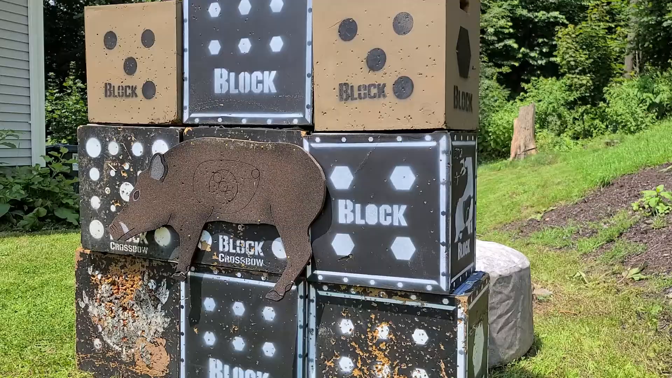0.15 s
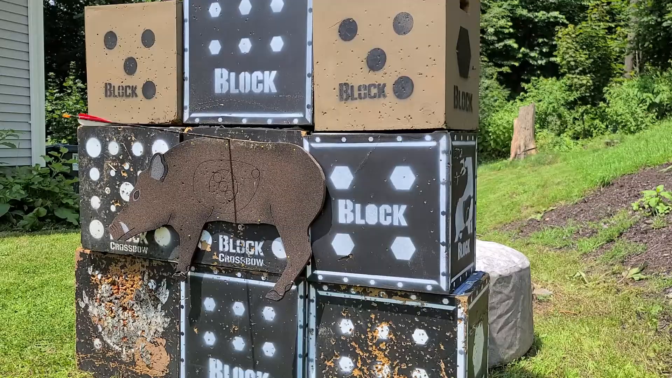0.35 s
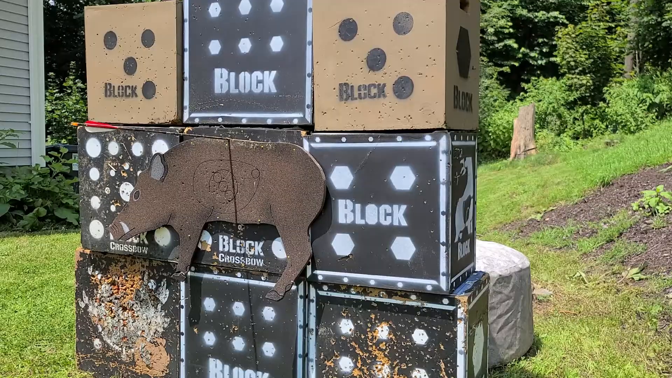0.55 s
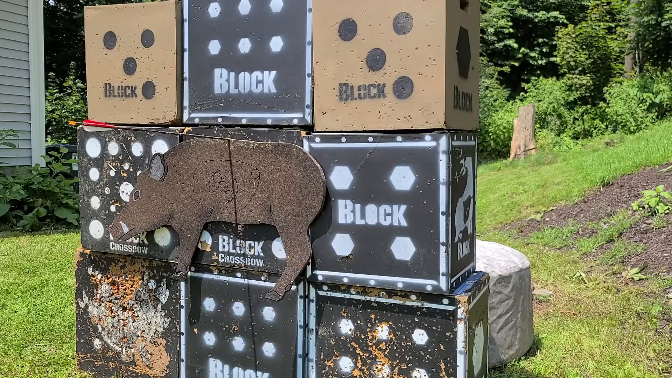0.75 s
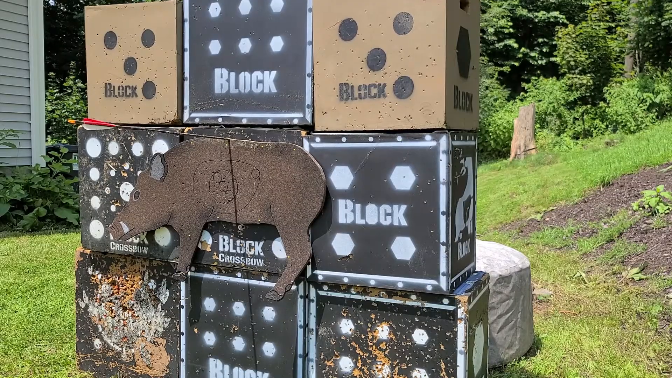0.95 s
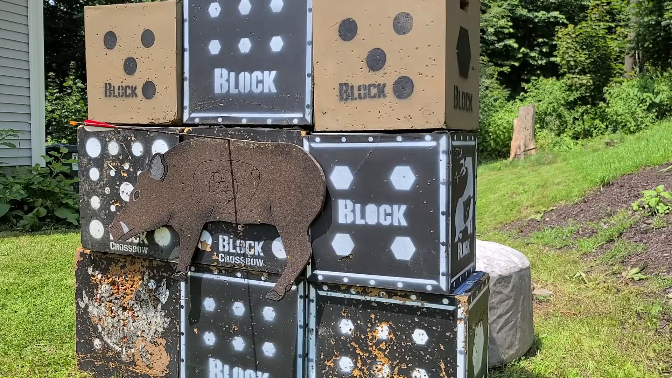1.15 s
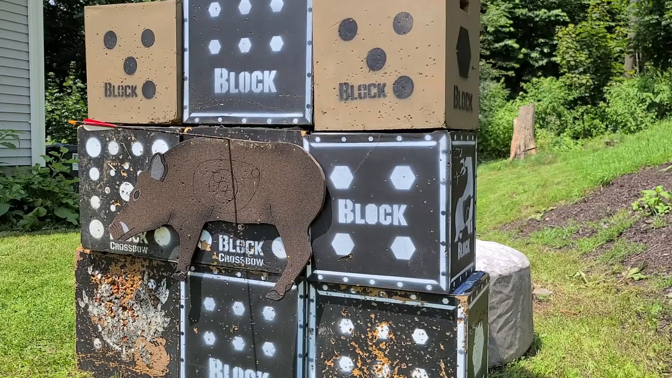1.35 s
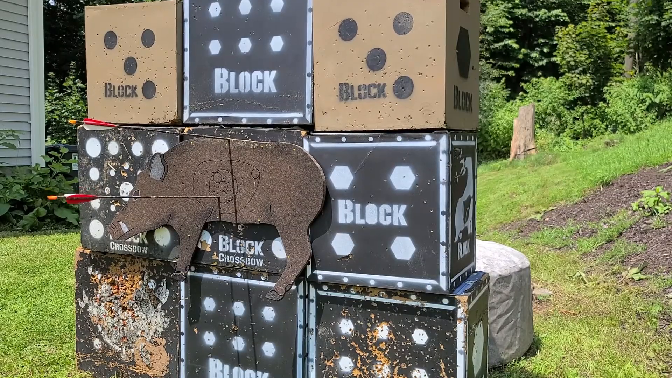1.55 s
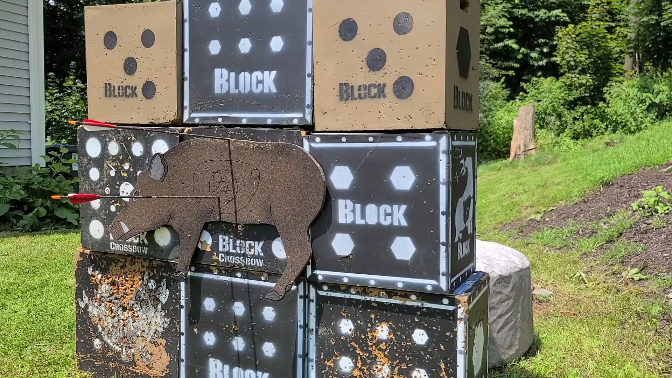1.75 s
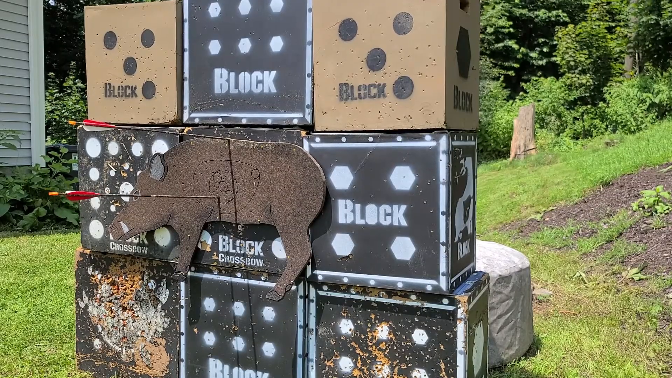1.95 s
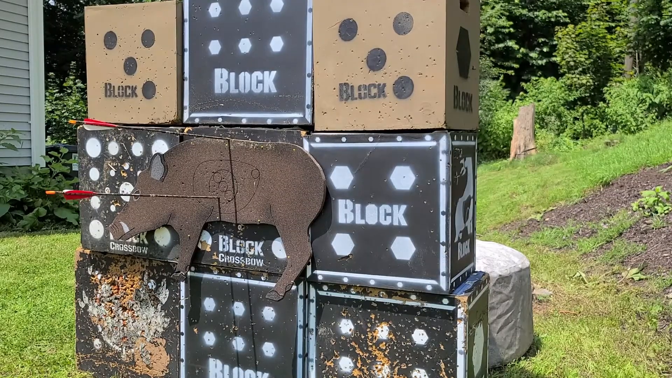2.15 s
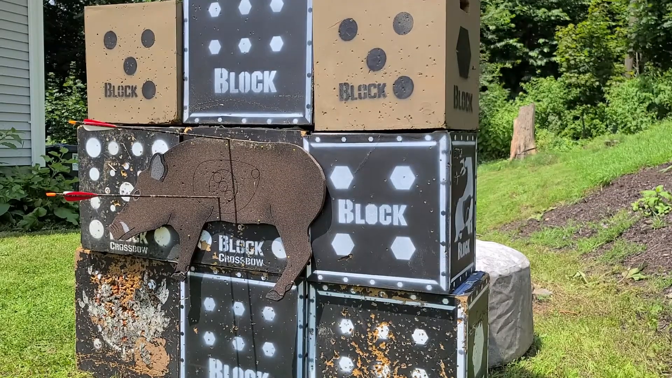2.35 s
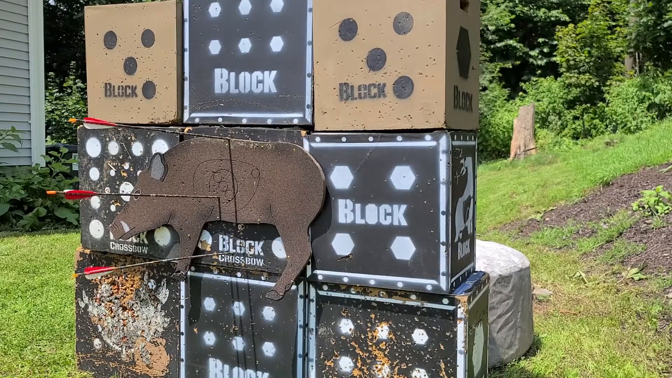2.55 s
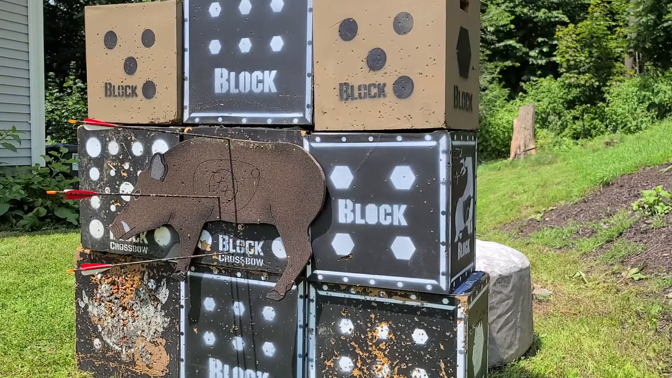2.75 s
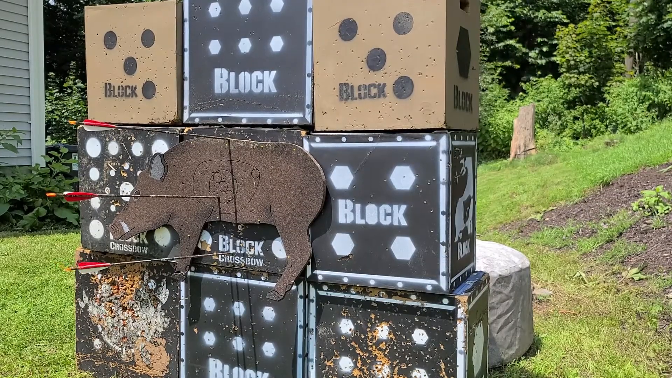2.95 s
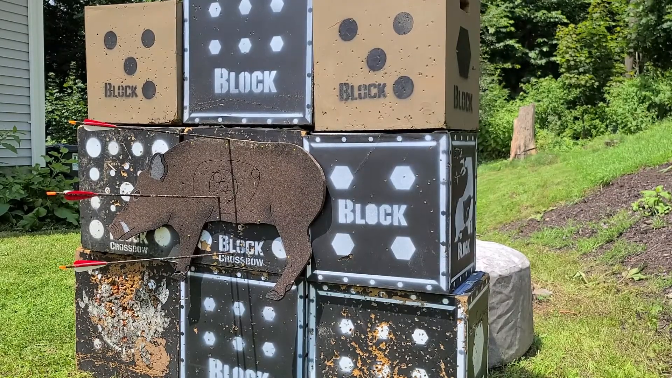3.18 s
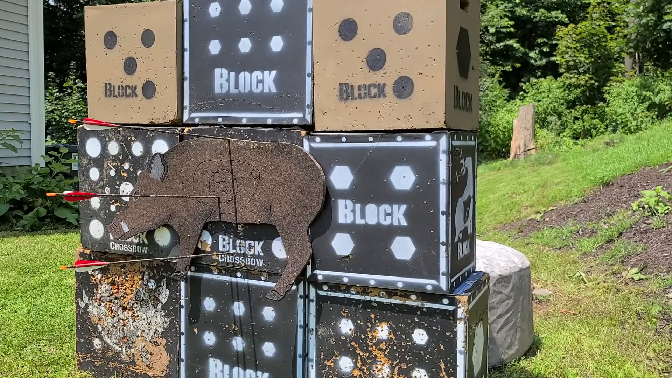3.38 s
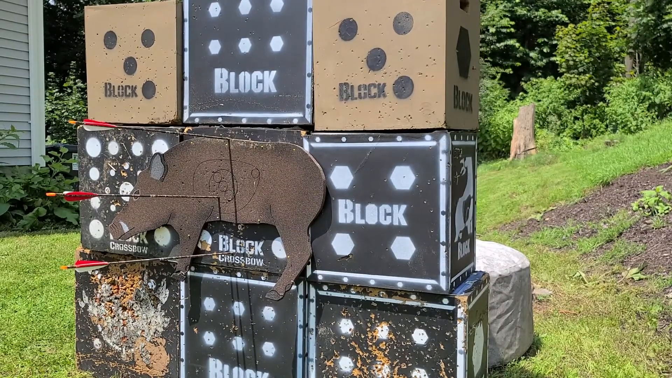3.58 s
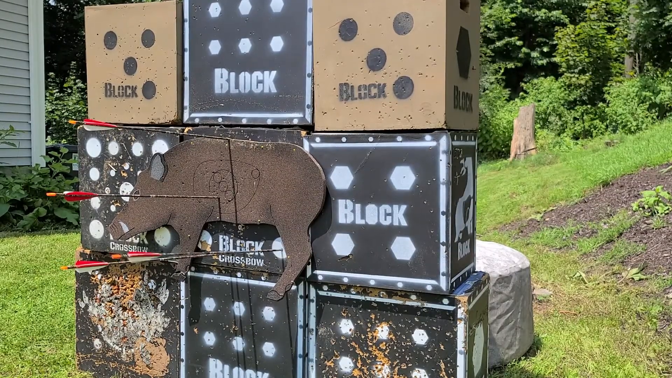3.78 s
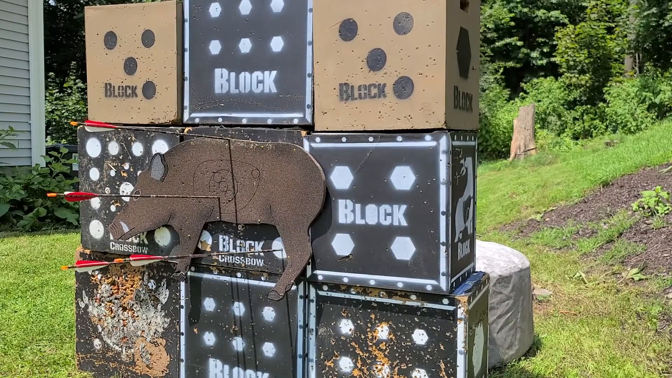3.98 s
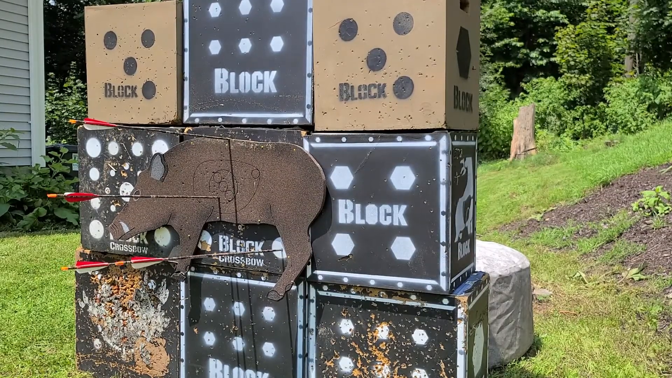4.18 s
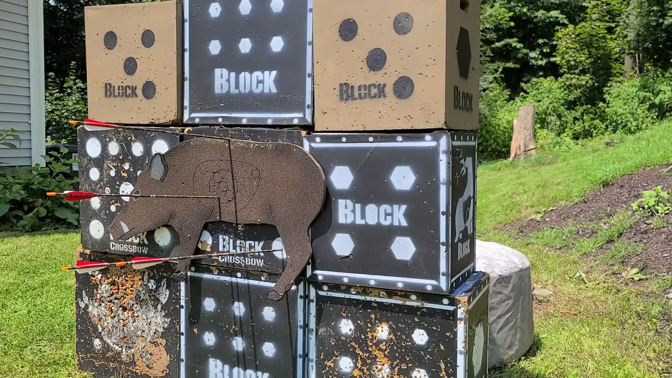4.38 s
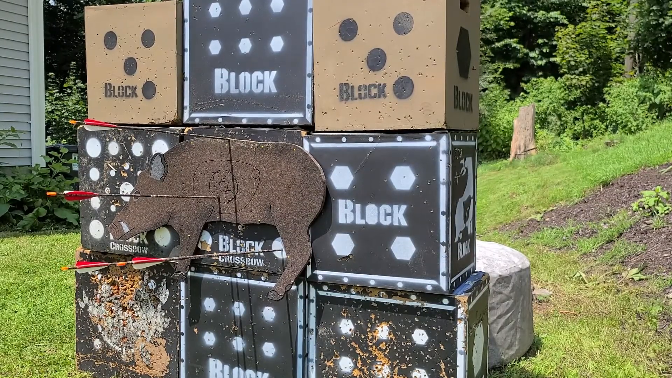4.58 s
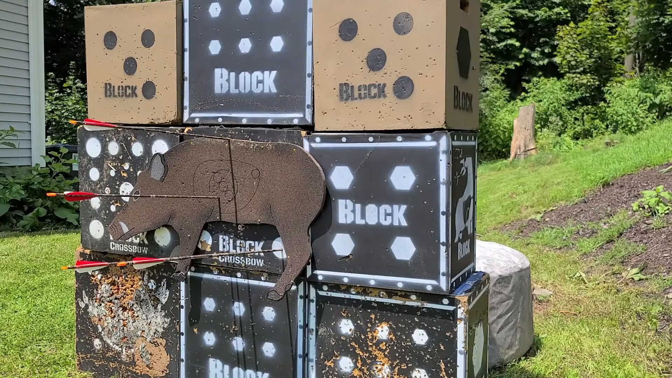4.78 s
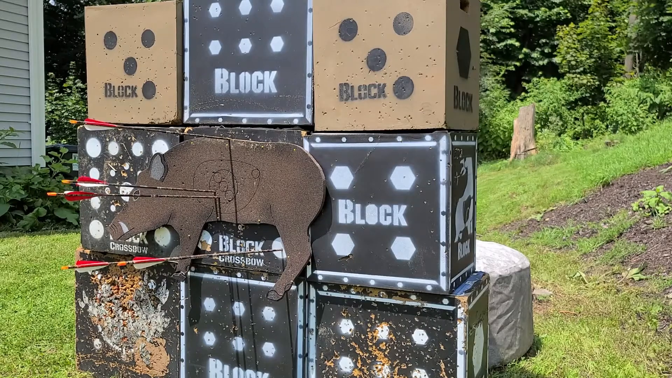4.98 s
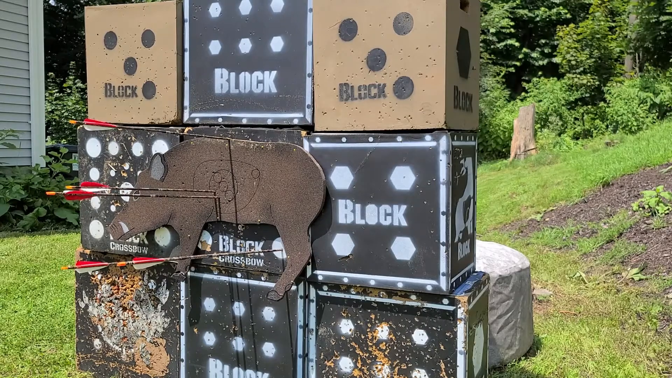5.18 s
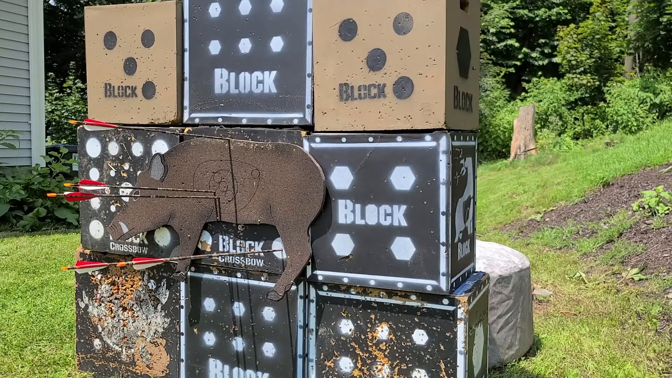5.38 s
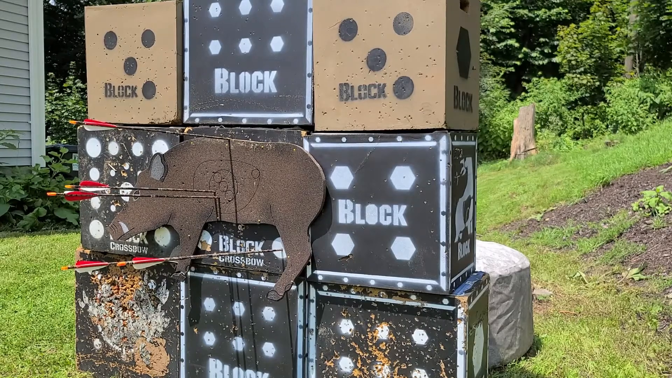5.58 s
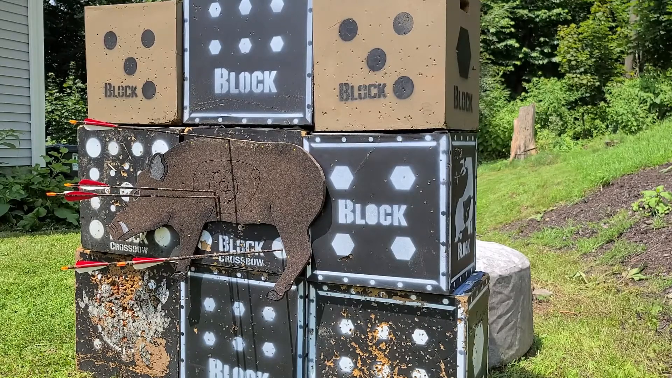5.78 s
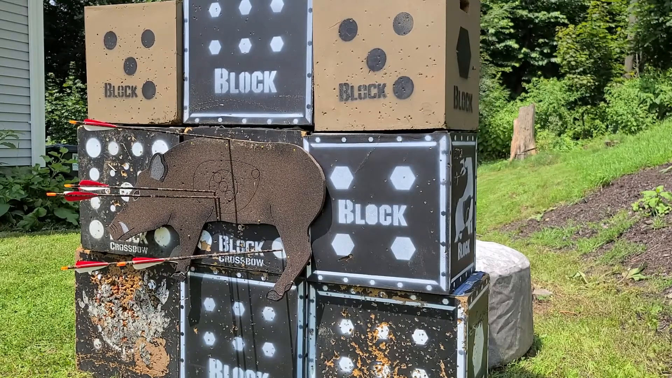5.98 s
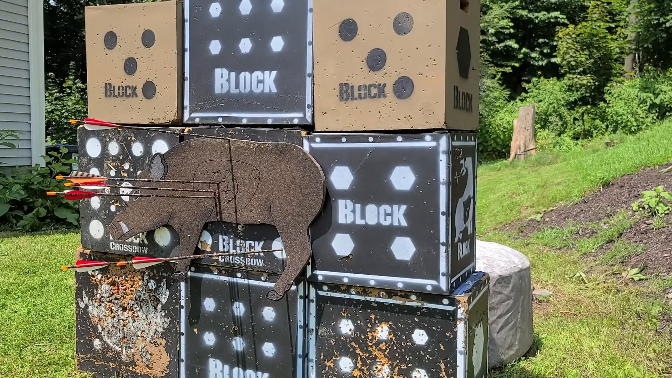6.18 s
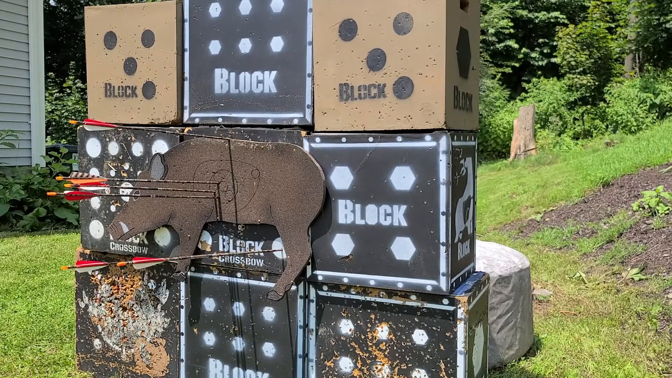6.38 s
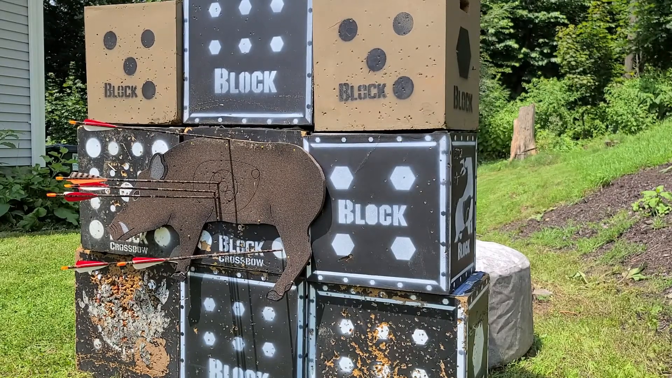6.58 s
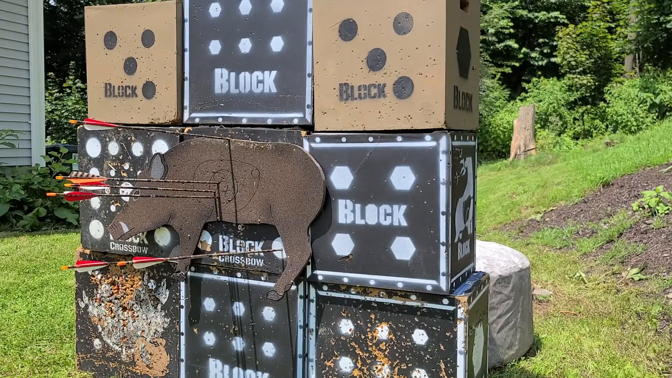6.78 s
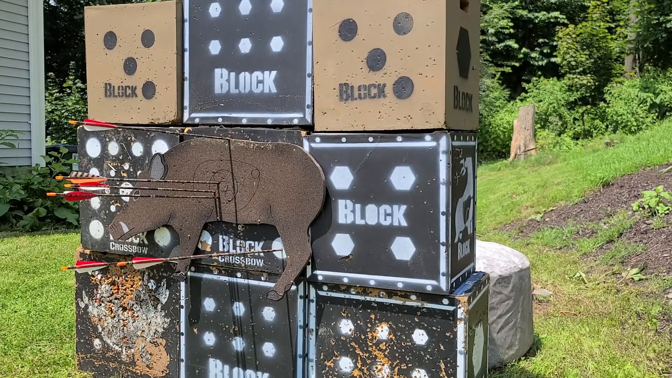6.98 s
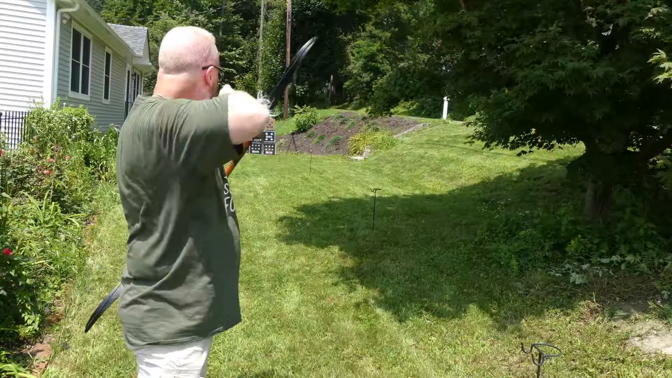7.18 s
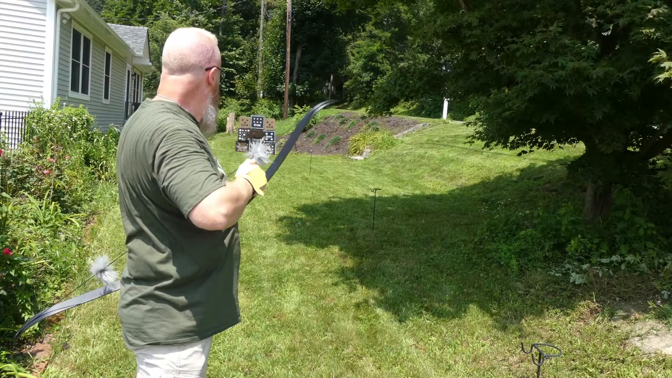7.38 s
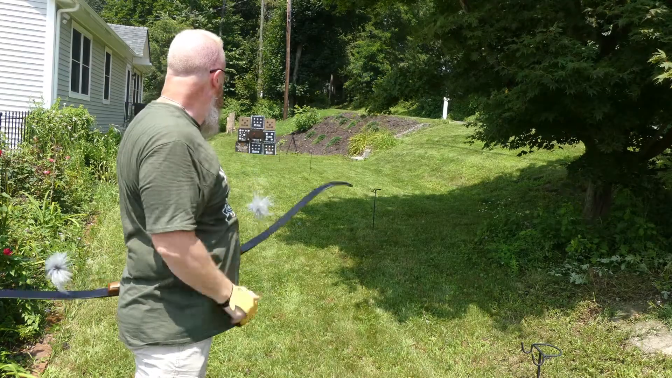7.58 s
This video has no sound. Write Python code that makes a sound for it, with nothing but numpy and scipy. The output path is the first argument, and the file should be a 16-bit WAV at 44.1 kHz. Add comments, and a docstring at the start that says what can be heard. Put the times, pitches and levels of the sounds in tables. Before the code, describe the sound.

A bowstring snaps, then six arrows hiss in and thwack hard into foam about a second apart, with light wind and chattering birds outdoors.

```python
"""Six arrows strike a stack of foam blocks on a lawn, heard from a stereo microphone beside the stack.
Each arrow hisses in as shaped noise, cracks as a spike and a short tone, and booms as a sinking tone swell;
struck resonators ring as foam and shaft, and four shafts then wag and tap their neighbours.
Behind lie yard echoes, coloured-noise wind and leaves, and far birds made of warbling and gliding sines.
The first and last moments use a mono microphone by the archer, with the birds kept in stereo."""
import sys
import numpy as np
from scipy import signal
from scipy.fft import rfft, irfft, next_fast_len
from scipy.io import wavfile

SR = 44100
rng = np.random.default_rng(int(sys.argv[2]) if len(sys.argv) > 2 else 0)


def inscribe(sig):
    """Save sig as 16-bit PCM at rate SR to the path in sys.argv[1].

    A 1-D sig is mono; a 2-D sig holds one channel per row.
    Samples are clipped to [-1, 1] before scaling.
    """
    pcm = np.round(np.clip(np.atleast_2d(sig).T, -1, 1) * 32767)
    wavfile.write(sys.argv[1], SR, pcm.astype(np.int16))


N = 336922


def amp(db):
    """Decibels to gain."""
    return 10 ** (np.asarray(db) / 20)


def rms_one(x):
    """Scale to rms 1."""
    return x / np.sqrt(np.mean(x ** 2) + 1e-20)


def in_time(rows):
    """Draw each curve column at every sample, straight between its points."""
    s, *columns = np.transpose(rows)
    return [np.interp(np.arange(N) / SR, s, c) for c in columns]


def at_hz(points, hz):
    """Read a spectrum on a log-frequency axis."""
    point_hz, values = np.array(points).T
    return np.interp(np.log(hz), np.log(point_hz), values)


def drift(rate_hz):
    """Slow random wander of rms 1: white noise twice through a one-pole low-pass."""
    r = np.exp(-2 * np.pi * rate_hz / SR)
    settled = signal.lfilter([1], [1, -2 * r, r * r], rng.standard_normal(N + SR))[SR:]
    return rms_one(settled)


# How alike the left and right of a noise are; columns: pitch_hz, likeness (-1 to 1)
LIKENESS = [(30, 0.98), (130, 0.94), (300, 0.72), (640, 0.21), (1400, -0.18), (3000, 0), (16000, -0.013)]


def noise(colour, likeness=LIKENESS):
    """Stereo noise of rms 1: mid and side spectra mixed to a given colour and left-right likeness."""
    size = next_fast_len(N)
    hz = np.maximum(np.fft.rfftfreq(size, 1 / SR), 1)
    alike = np.clip(at_hz(likeness, hz), -1, 1)
    gain = (hz > colour[0][0]) * amp(at_hz(colour, hz))   # nothing below the first point
    mid, side = rfft(rng.standard_normal((2, size))) * gain
    mid, side = np.sqrt(1 + alike) * mid, np.sqrt(1 - alike) * side
    return rms_one(irfft(mid + side * [[1], [-1]], size)[:, :N])


def clicks_at(times, db):
    """A click of the given level at each time."""
    out = np.full(N, 1e-18)
    out[np.round(np.asarray(times) * SR).astype(int)] = amp(db)
    return out


def ring(clicks, hz, t60):
    """Two-pole resonator: a unit click sets off a sine of height 1 that dies by 60 dB in t60 seconds."""
    r, w = amp(-60 / (t60 * SR)), 2 * np.pi * hz / SR
    return signal.lfilter([0, np.sin(w)], [1, -2 * r * np.cos(w), r * r], clicks + 1e-18)


def body(modes, knocks):
    """A set of modes, neighbours in opposite sign, struck by one signal."""
    return sum((-1) ** k * amp(db) * ring(knocks, hz, t60) for k, (hz, db, t60) in enumerate(modes))


def swell(ms, hz, peak_ms, sharp, fall=0):
    """A tone that crests at peak_ms, where its pitch is hz, and dies away; pitch goes as time^-fall."""
    rise, keep = ms / peak_ms, 1 - np.clip(fall, 0, .7)
    cycles = hz * peak_ms / 1000 * (rise ** keep - 1) / keep
    return (rise * np.exp(1 - rise)) ** sharp * np.cos(2 * np.pi * cycles)


RIGHT_LAG_S = 0.00011
SHADE_HZ, SHADE_SHARE = 4000, 0.34   # the microphone body shades the right port around this pitch


def from_left(x):
    """The stack stands to the left: the right port hears it a moment later and a little shaded."""
    n = np.arange(N)
    around = signal.butter(1, [SHADE_HZ / 2, SHADE_HZ * 2], "band", fs=SR, output="sos")
    shaded = x - SHADE_SHARE * signal.sosfilt(around, x)
    return np.array([x, np.interp(n - RIGHT_LAG_S * SR, n, shaded)])


STRING_DB, STRING_T60_S = -27, 0.046


def string_snap():
    """The snap of the bowstring: mono noise in the colour of the flight hiss, dying from the very start."""
    t = np.arange(N) / SR
    return amp(STRING_DB - 60 * np.minimum(t, 1) / STRING_T60_S) * noise(FLIGHT)[0]


# Garden wash by the archer, one curve for the opening and one for the end; columns: time_s, level_db
ARCHER_WASH = [
    [(0.0, -32), (0.024, -43), (0.14, -42), (0.215, -45)],
    [(7.208, -43), (7.29, -46), (7.414, -47), (7.64, -47.5)],
]
# Colour of the opening wash, while the bow still hums; columns: pitch_hz, level_db (per Hz)
RELEASE_COLOUR = [(76, -20), (130, -7), (298, -6), (945, -23.5), (1020, -11), (1110, -32), (1280, -20.5),
                  (3590, -20.5), (6730, -34), (14800, -28.5), (16400, -46)]
# Colour of the closing wash; columns: pitch_hz, level_db (per Hz)
ARCHER_COLOUR = [(76, -34), (130, 1.5), (144, -9.5), (456, -3.5), (515, -5.5), (907, -3.5), (1050, -10.5),
                 (1880, -19), (2700, -17.5), (3060, -12), (3500, -20), (4680, -26), (6330, -30.5),
                 (7450, -34), (14800, -34), (16400, -27)]


def archer_wash():
    """Mono coloured noise whose level follows a curve, with one colour at the start and one at the end."""
    first, last = [amp(in_time(part)[0]) for part in ARCHER_WASH]
    opening = first * noise(RELEASE_COLOUR)[0]
    closing = last * noise(ARCHER_COLOUR)[0]
    return np.where(np.arange(N) / SR < 1, opening, closing)


FAR_STRIKE_S, FAR_STRIKE_DB = .1052, -11
# Modes of the strike as heard by the archer; columns: pitch_hz, level_db (over the strike), t60_s
FAR_MODES = [(576, -18, 0.022), (1090, -14, 0.023), (2210, 1, 0.0036), (3220, -2, 0.009),
             (7360, -4.5, 0.0014), (11800, -3.5, 0.0005)]


def far_strike():
    """One click sets a few short modes ringing: a strike heard from afar."""
    return body(FAR_MODES, clicks_at([FAR_STRIKE_S], FAR_STRIKE_DB))


def archer():
    """What the mono microphone by the archer hears besides wind and birds."""
    return archer_wash() + string_snap() + far_strike()


LUMPS_DB, LUMPS_PER_S = 5.5, 9.9   # spread of the level wander shared by both ports, and its corner in Hz
# Wind on the stereo microphone ports; columns: time_s, level_db
WIND = [(0, -68), (.18, -55), (.32, -34), (.8, -43), (1.07, -33), (1.3, -41), (1.48, -29), (1.8, -28.5),
        (2.0, -35), (2.33, -39.5), (2.55, -34.5), (2.83, -24.5), (2.9, -38.5), (3.35, -38), (3.41, -28),
        (3.68, -36), (3.8, -45), (4.03, -35), (4.25, -50), (4.9, -41), (5.35, -37), (5.5, -42.5),
        (5.9, -38), (6.4, -46), (6.8, -39), (7.4, -49), (7.64, -44.5)]
# Wind rumble; columns: pitch_hz, level_db (per Hz)
WIND_COLOUR = [(12, -35.5), (20, -10.5), (43, -1), (64, 0.5), (109, -10.5), (145, -24), (252, -34.5),
               (400, -34), (520, -65.5), (880, -120)]
# How alike the wind is on both ports; columns: pitch_hz, likeness (-1 to 1)
WIND_LIKENESS = [(25, 0.12), (60, .15), (150, 0.58), (400, 0.4)]


def wind():
    """Wind on the ports: low noise in uneven lumps, under a slower curve of gusts."""
    shared_db = LUMPS_DB * drift(LUMPS_PER_S)
    own_db = 0.91 * np.array([drift(5.5), drift(16.0)])   # left, right
    lumpy = noise(WIND_COLOUR, WIND_LIKENESS) * amp(shared_db + own_db)
    return amp(in_time(WIND)[0]) * rms_one(lumpy)


FLIGHT_DB, FLIGHT_RISE_S = -50, 0.14   # level on landing; time to grow e-fold
# Feather hiss; columns: pitch_hz, level_db (per Hz)
FLIGHT = [(500, -8.5), (1500, -3.5), (3500, -3), (7000, -10), (16000, -18)]


def flight():
    """The feathers hiss louder until the arrow lands: noise that grows exponentially, then stops."""
    ahead = np.array([row[0] - np.arange(N) / SR for row in STRIKES])
    approach = np.sum((ahead > 0) * np.exp(-np.abs(ahead) / FLIGHT_RISE_S), 0)
    return amp(FLIGHT_DB) * approach * noise(FLIGHT)


LEAVES_DB, AFTER_STRIKE_DB, AFTER_STRIKE_S = -55, 6.5, 0.14   # resting level, lift, e-fold settling
# Garden wash by the stack; columns: pitch_hz, level_db (per Hz)
LEAF_COLOUR = [(76, -24), (130, 0.5), (147, -20), (183, -10.5), (310, -15), (404, -13.5), (670, -20.5),
               (837, -20.5), (1310, -24.5), (3980, -26), (15100, -44), (16400, -60)]


def leaves():
    """A nearly steady wash of coloured noise that each strike lifts for a moment."""
    since = np.array([np.arange(N) / SR - row[0] for row in STRIKES])
    lift_db = AFTER_STRIKE_DB * np.sum((since > 0) * np.exp(-np.abs(since) / AFTER_STRIKE_S), 0)
    return amp(LEAVES_DB + lift_db + 0.28 * drift(6.)) * noise(LEAF_COLOUR)


SPIKE_MS = 0.057   # e-fold width on each side


def tip_crack(ms, grit, crack_db, crack_hz, crest_ms, spike_db, tip_hz, tip_db):
    """A short tone burst, a sharp spike with gritty noise as the tip breaks the skin, and the tip's ring."""
    rise = ms / crest_ms
    burst = -amp(crack_db) * np.sin(2 * np.pi * crack_hz * ms / 1000) * rise * np.exp(1 - rise)
    spike = -np.exp(-np.abs(ms - .3) / SPIKE_MS)
    gritty = 0.06 * grit * np.exp(-ms / 1.2)
    tip_ring = amp(tip_db) * swell(ms, tip_hz, 0.298, 1)
    return burst + amp(spike_db) * (spike + gritty) - tip_ring


BOOM_FALL, BOOM_ROUGH = 0.31, 0.49   # exponent of the pitch fall over time, 0-0.7; depth of the roughness


def block_boom(ms, grit, boom_hz, boom_db, crest_ms, sharp):
    """A tone grows and sinks in pitch while the shaft slides in, roughened by a random level wander below 300 Hz."""
    roughness = rms_one(signal.sosfilt(signal.butter(2, 300, fs=SR, output="sos"), grit))
    return amp(boom_db) * swell(ms, boom_hz, crest_ms, sharp, BOOM_FALL) * (1 + BOOM_ROUGH * roughness)


THUD_CREST_CYCLES = 1.45   # the thud peaks after this many cycles


def stack_thud(ms, thud_hz, thud_db):
    """The whole stack thuds: a low tone that swells and dies within a few cycles."""
    return amp(thud_db) * swell(ms, thud_hz, THUD_CREST_CYCLES / thud_hz * 1000, 3.1)


def strike(row, grit):
    """Half a second of one strike, and apart from it the crack's echo off the lawn."""
    ms = np.arange(SR // 2) / SR * 1000
    lawn_ms, lawn_db = row[7:9]
    crack = tip_crack(ms, grit, *row[1:7])
    boom = block_boom(ms, grit, *row[9:13])
    thud = stack_thud(ms, *row[13:15])
    lawn = amp(lawn_db) * np.interp(ms - lawn_ms, ms, crack, left=0)
    return crack + boom + thud, lawn


CRUNCH_DB, CRUNCH_MS, YARD_DB = -21.5, 4.7, -12.5   # crunch_ms is its e-fold decay; yard_db the send
# Arrow strikes; columns: time_s, crack_db, crack_hz, crack_crest_ms, tip_spike_db, tip_ring_hz, tip_ring_db,
#     lawn_echo_ms, lawn_echo_db (over the crack), boom_hz (at its crest), boom_db, boom_crest_ms,
#     boom_sharpness (exponent), thud_hz, thud_db, shaft_knock_db
STRIKES = [(0.3387, -12, 734, 0.32, -4, 1596, -13, 1.98, 9.5, 454, -7, 6.55, 1.4, 78.9, -10, -26.5),
           (1.5092, -4, 1416, 0.4, 0, 3000, -20, 1.79, -2, 455, -14.5, 10.4, 1.63, 60.5, -16, -31),
           (2.555, -6.5, 1530, 0.09, 0, 3270, -16, 1.52, 3, 646, -5.5, 7.1, 22, 60.8, -15.5, -30),
           (3.8647, -11, 1283, 0.83, -7.5, 3900, -6, 1.57, 1.5, 643, -1, 6.5, 22.6, 62.4, -21.5, -37),
           (4.9944, 2, 1396, 0.31, -5, 4710, -24.5, 1.8, -9.5, 430.6, -11.5, 8.87, 2.3, 62, -18, -23.5),
           (6.1571, -4, 758, 1, -2, 1790, -14.5, 1.81, -5, 545, -11.5, 7.4, 1.16, 63.4, -16, -39)]
# Ringing of the foam blocks; columns: pitch_hz, level_db (before a random offset per strike), t60_s
FOAM = [(183, -17, 0.063), (338, -22.5, 0.06), (434, -20.5, 0.088), (712, -18.5, .06), (936, -21.5, 0.046)]
# Woody modes of the shaft; columns: pitch_hz, level_db (over the knock), t60_s
KNOCK = [(630.8, -0.5, 0.085), (816, -2, 0.11), (1193, -2, 0.059), (1422, 8.5, 0.029), (1820, -8, 0.16),
         (2204, -11.5, 0.038)]
# Crunch of the foam; columns: pitch_hz, level_db (per Hz)
CRUNCH_COLOUR = [(150, -10), (600, -21.5), (1500, -11), (4000, -11), (8000, -22), (16000, -36)]


def strikes():
    """Every strike, the modes it excites, the noisy crunch of the foam and the yard's answer."""
    dry, sent, crunch = np.zeros(N + SR), np.zeros(N + SR), np.zeros(N)
    grits = rng.standard_normal((len(STRIKES), SR // 2))
    for row, grit in zip(STRIKES, grits):
        start = round(row[0] * SR)
        sound, lawn = strike(row, grit)
        dry[start:start + SR // 2] += sound + lawn
        sent[start:start + SR // 2] += amp(YARD_DB) * sound
        since_ms = np.arange(N - start) / SR * 1000
        crunch[start:] += amp(CRUNCH_DB) * np.exp(-since_ms / CRUNCH_MS)
    times = [row[0] + 0.00297 for row in STRIKES]   # the modes start about 3 ms in
    offsets_db = rng.normal(0, 3.3, (len(STRIKES), len(FOAM)))
    foam = np.zeros(N)
    for k, (hz, db, t60) in enumerate(FOAM):
        foam += ring(clicks_at(times, db + offsets_db[:, k]), hz, t60)
    knock = body(KNOCK, clicks_at(times, [row[-1] for row in STRIKES]))
    return from_left(dry[:N] + foam + knock) + crunch * noise(CRUNCH_COLOUR) + yard(sent)


# Echoes off house and trees; columns: delay_ms, level_db (against each other), smear_ms, dull_above_hz
YARD = [(15.59, 13.5, 11, 9300), (46.7, -2, 23, 2300), (89.8, -26, 73, 3000)]
# Colour of the echoes; columns: pitch_hz, level_db (per Hz)
YARD_COLOUR = [(100, -21.5), (300, -3.5), (1000, -5.5), (4000, 3), (8000, 10), (16000, -0.5)]


def yard(x):
    """Echoes off house and trees, each smeared into a burst of reflections and dulled by what throws it back."""
    ms = np.arange(SR // 2) / SR * 1000
    response = np.zeros((2, SR // 2))
    scatter = noise(YARD_COLOUR, [(300, 1.0), (1500, 0.22), (5000, 0.19)])[:, :SR // 2]
    for delay_ms, echo_db, smear_ms, dull_hz in YARD:
        since = np.maximum(ms - delay_ms, 0) / smear_ms
        r = np.exp(-2 * np.pi * dull_hz / SR)
        dulled = signal.lfilter([1 - r], [1, -r], scatter)
        response += amp(echo_db) * np.sqrt(since) * np.exp(-since) * dulled
    unit_energy = response / np.sqrt(np.sum(response ** 2) / 2)
    return signal.fftconvolve(x[None], unit_energy)[:, :N]


RATTLE_MS = 4.2   # e-fold decay
# A wagging shaft taps its neighbour once a swing; columns: first_tap_s, last_tap_s, swing_s,
#     first_rattle_db, last_rattle_db, two_lowest_modes_db (over the rattle), knock_db (over the rattle)
WAGS = [(.4945, .8492, .0591, -58.5, -58.5, -8, -14), (1.5733, 1.6118, .0385, -40, -43, 4, -20),
        (2.6235, 3.0235, .0667, -48, -54, -2, -18), (5.0508, 5.1607, .055, -40, -52, 0, -3)]
# Thin modes of the shaft; columns: pitch_hz, level_db (over the rattle), t60_s
SHAFT = [(3720, 1, 0.0012), (4900, 0.5, 0.0055), (6300, -7.5, 0.001), (7900, -4.5, 0.0017),
         (10100, -8, 0.0011), (12800, -11, 0.00082)]


def taps():
    """Each tap is a few milliseconds of noise rattling the thin shaft modes, with a woody knock."""
    rows = []
    for first, last, swing, first_db, last_db, *rest in WAGS:
        for p in np.linspace(0, 1, round((last - first) / swing) + 1):
            rows.append((first + p * (last - first), first_db + p * (last_db - first_db), *rest))
    s, rattle_db, low_db, knock_db = np.transpose(rows)
    grit = rng.standard_normal(N)
    decay = np.exp(-1000 / SR / RATTLE_MS)
    high = signal.lfilter([1], [1, -decay], clicks_at(s, rattle_db)) * grit
    low = signal.lfilter([1], [1, -decay], clicks_at(s, rattle_db + low_db)) * grit
    knock = body(KNOCK, clicks_at(s, rattle_db + knock_db))
    return from_left(body(SHAFT[:2], low) + body(SHAFT[2:], high) + knock)


CHATTER_FLOOR_DB, CHATTER_RISE_S = -80, 0.014   # the floor sounds throughout
CHATTER_SAG_PER_S = 0.53   # share of its pitch that a bout loses per second, over its first quarter second
# Bouts of far birds; columns: time_s, level_db, fading_s (e-fold), centre_hz (as it starts)
CHATTER = [(.9, -91, .3, 3498), (1.32, -63, 0.036, 4058), (1.721, -54, 0.16, 4100), (1.86, -59, 0.22, 4040),
           (2.1, -52, 0.028, 3677), (2.31, -60, 0.17, 3537), (3.178, -56.5, 0.053, 3546),
           (3.381, -53.5, 0.13, 3675), (4.079, -57.5, 0.044, 3920), (4.34, -58, .05, 3483),
           (4.5, -61, 0.19, 3305), (4.701, -49.5, 0.26, 3990), (5.25, -59, 0.09, 3730),
           (5.8, -66, 0.17, 3583), (6.55, -60.5, .3, 3603), (7.11, -67, 0.04, 3450)]


def bouts():
    """Level and pitch centre of the chatter: each bout rises quickly and fades, and the next dip ends it."""
    t = np.arange(N) / SR
    level = np.full(N, amp(CHATTER_FLOOR_DB))
    for s, db, fading, hz in CHATTER:
        since = np.maximum(t - s, 0)
        before_dip = t < min(dip for dip in DIPS_S if dip > s)
        level += amp(db) * np.minimum(since / CHATTER_RISE_S, 1) * np.exp(-since / fading) * before_dip
    starts, pitches = np.array(CHATTER)[:, [0, 3]].T
    now = np.maximum(np.searchsorted(starts, t) - 1, 0)
    return level, pitches[now] * (1 - CHATTER_SAG_PER_S * np.clip(t - starts[now], 0, .25))


WARBLE = .09   # share of its pitch by which a voice wanders (rms)
TREES_T60_S = 0.15


def chatter():
    """Four quickly warbling sines, scattered by the trees, blur into chatter."""
    level, centre_hz = bouts()
    song = np.zeros(N)
    for voice in range(4):
        hz = centre_hz * (1 + WARBLE * drift(30.0))
        song += amp(3.4 * drift(25.)) * np.sin(2 * np.pi * np.cumsum(hz) / SR)
    t = np.arange(SR // 4) / SR
    scatter = rng.standard_normal((2, len(t))) * amp(-60 * t / TREES_T60_S)
    return level * rms_one(signal.fftconvolve(song[None], scatter)[:, :N])


# Single bird glides; columns: time_s, length_s, from_hz, to_hz, level_db (before flutter), pan_db (left over right)
GLIDES = [(0.99, 0.037, 3600, 3280, -62, 4.5), (4.287, 0.2, 5550, 6470, -68, 14),
          (4.331, 0.04, 3900, 3480, -61.5, -1), (4.356, 0.048, 3200, 3020, -61, 0.),
          (5.744, 0.1, 1660, 1920, -63.5, 3.5), (7.226, 0.029, 3730, 3960, -50, 1),
          (7.24, 0.048, 3600, 3340, -49.5, 0.), (7.343, 0.04, 6900, 6200, -55.5, 5)]


def glides():
    """Single fluttering sines whose pitch glides fast at first and levels out as they end."""
    out = np.zeros((2, N))
    wobble = 1 + .012 * drift(50.)
    flutter = amp(4.1 * drift(64.0))
    for s, length, from_hz, to_hz, db, pan_db in GLIDES:
        part = np.clip((np.arange(N) / SR - s) / length, 0, 1)
        hz = wobble * (to_hz + (from_hz - to_hz) * (1 - part) ** 2.0)
        tone = np.sin(2 * np.pi * np.cumsum(hz) / SR)
        out += amp(db) * flutter * np.sin(np.pi * part) * tone * amp([[pan_db / 2], [-pan_db / 2]])
    return out


DIP_GAP_S, DIP_HALF_S = 0.0035, 0.037   # on each side: start of the ramp after the centre, slope of the ramp
# Brief dips of the whole level, the first and last at the change of microphone; column: time_s
DIPS_S = [.213, 1.376, 2.41, 3.711, 4.844, 6.01, 7.211]


def scene():
    """The archer's microphone at both ends, the one by the stack between, with brief level dips."""
    t = np.arange(N) / SR
    by_stack = (t > DIPS_S[0]) & (t < DIPS_S[-1])
    gusts = wind()
    by_archer = archer() + 2.8 * gusts.mean(0)   # mono wind, turned up
    near = gusts + flight() + leaves() + strikes() + taps()
    mix = np.where(by_stack, near, by_archer) + chatter() + glides()
    # each dip bottoms out at about -35 dB
    ramps = [np.clip((np.abs(t - s) - DIP_GAP_S) / DIP_HALF_S, .03, 1) ** 1.15 for s in DIPS_S]
    return mix * np.prod(ramps, 0)


CEILING, CUTOFF_HZ = 1, 16300


def record(dry):
    """Peaks are rounded at the ceiling, then a steep low-pass cuts the top."""
    rounded = dry / (1 + (np.abs(dry) / CEILING) ** 6) ** (1 / 6)
    return signal.sosfilt(signal.cheby2(22, 60, CUTOFF_HZ, fs=SR, output="sos"), rounded)


dry = scene()
out = record(dry)
inscribe(out)
```